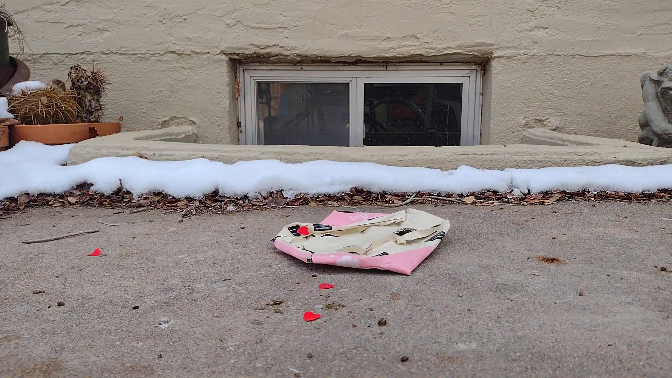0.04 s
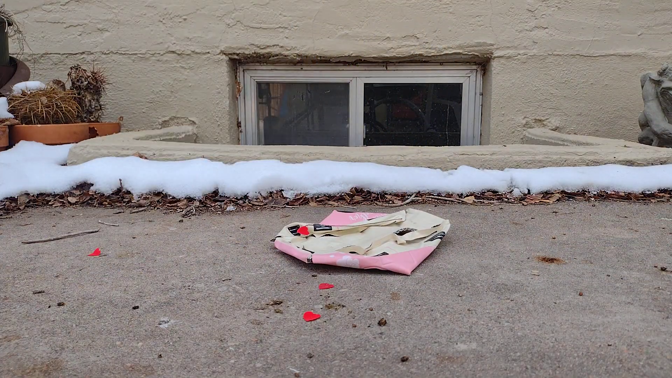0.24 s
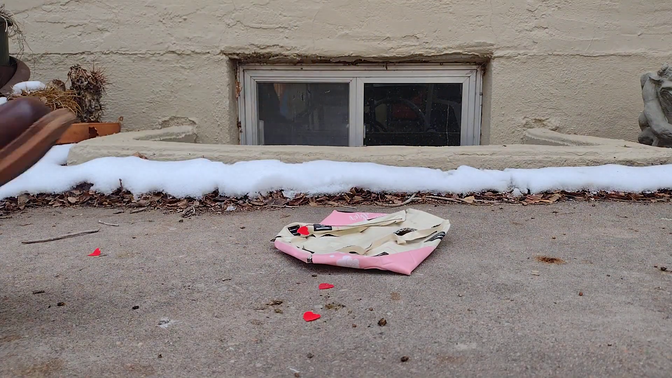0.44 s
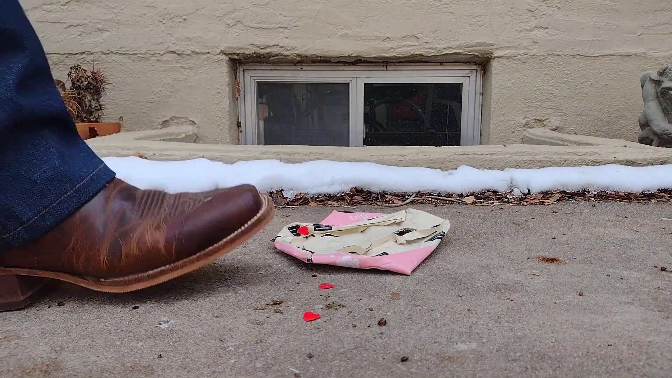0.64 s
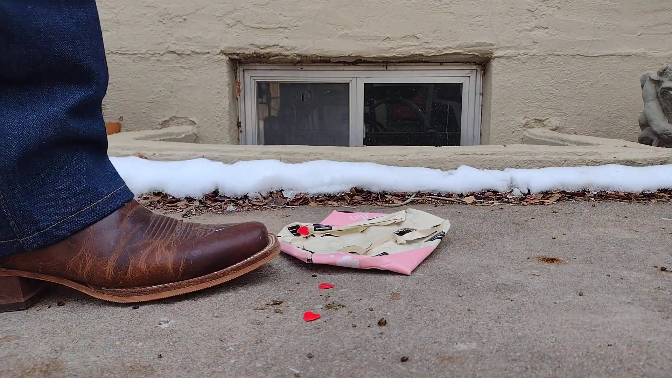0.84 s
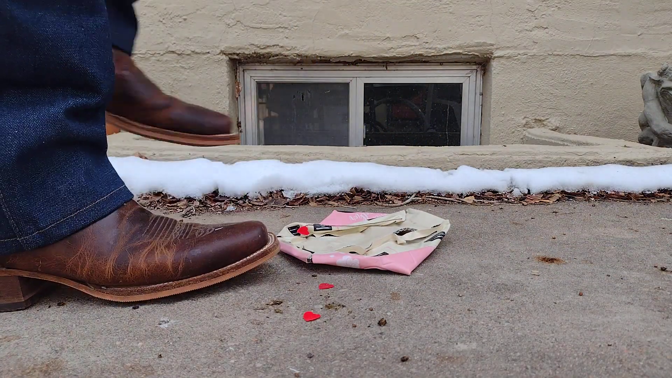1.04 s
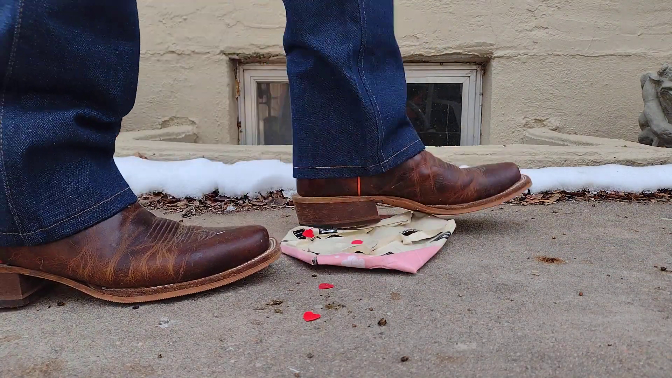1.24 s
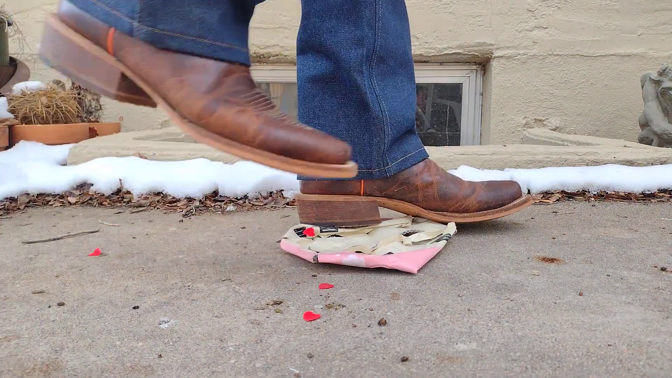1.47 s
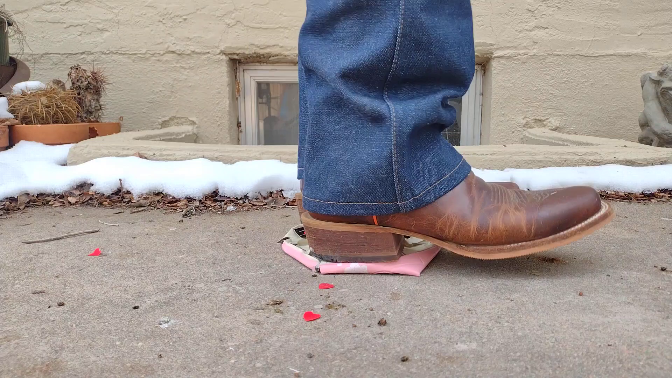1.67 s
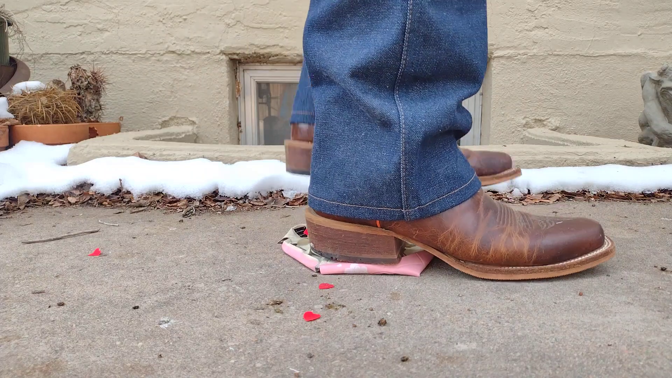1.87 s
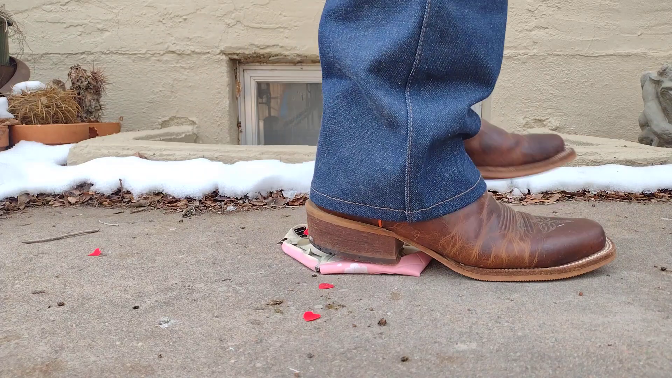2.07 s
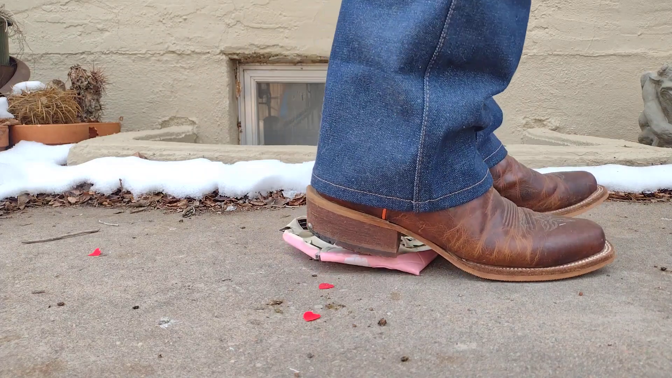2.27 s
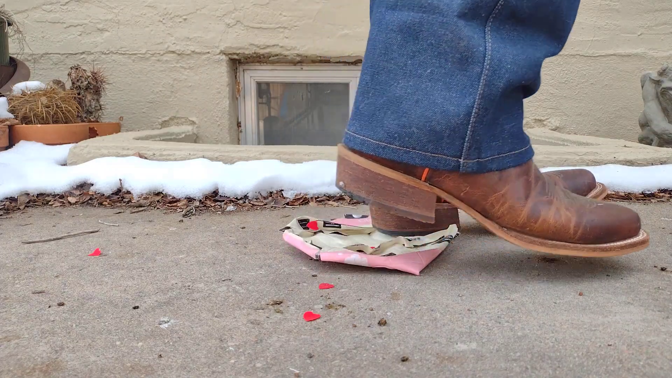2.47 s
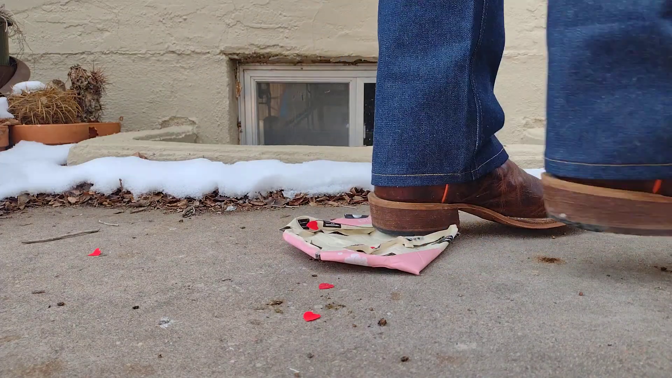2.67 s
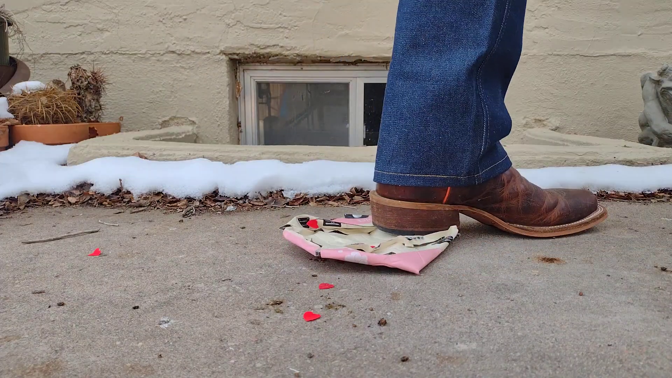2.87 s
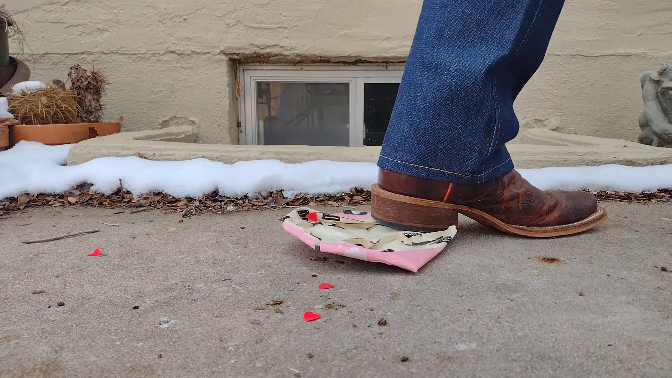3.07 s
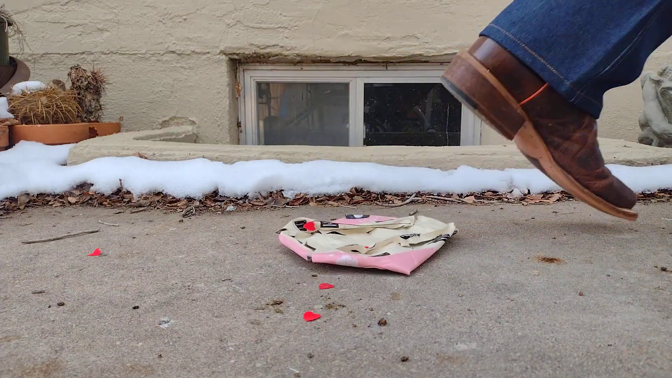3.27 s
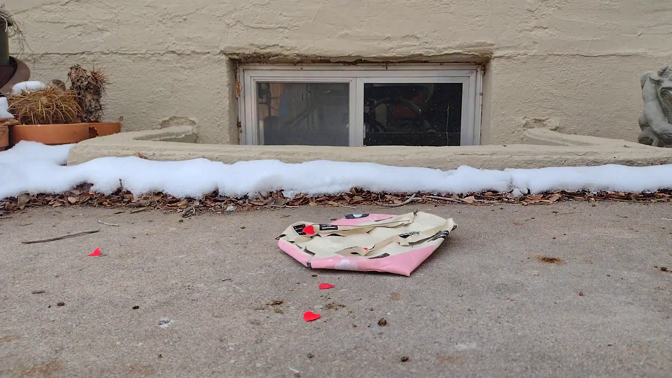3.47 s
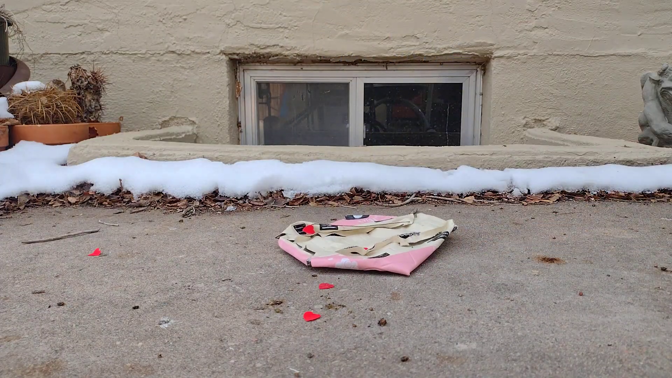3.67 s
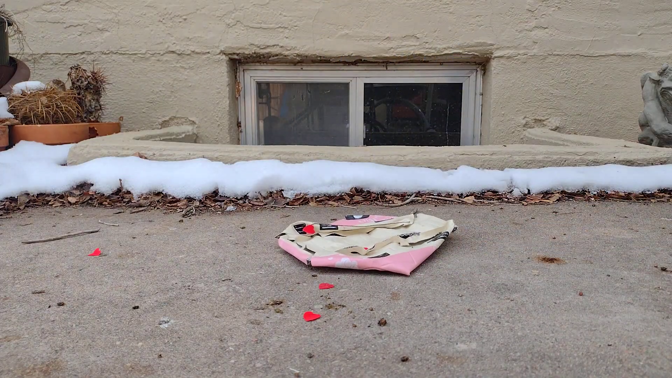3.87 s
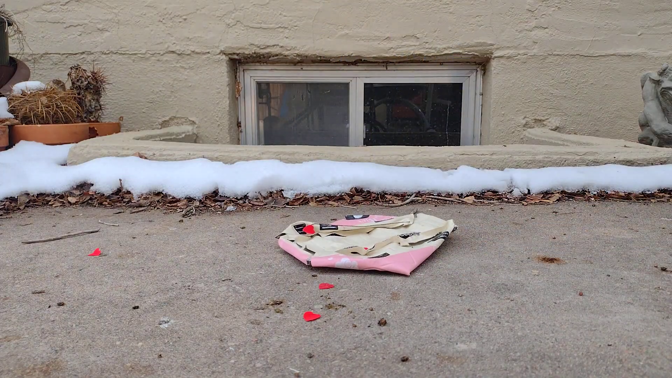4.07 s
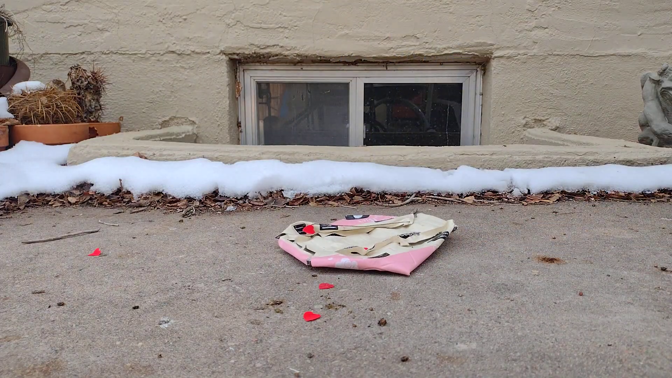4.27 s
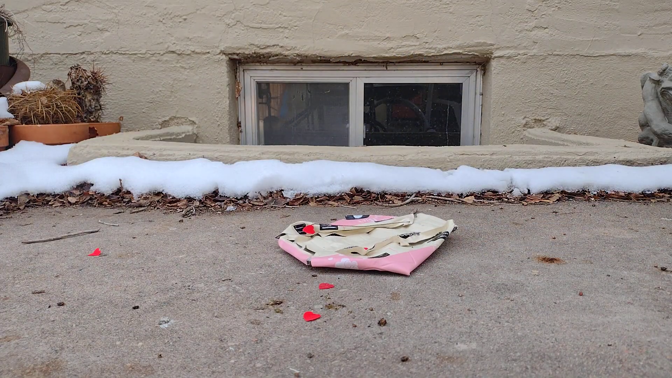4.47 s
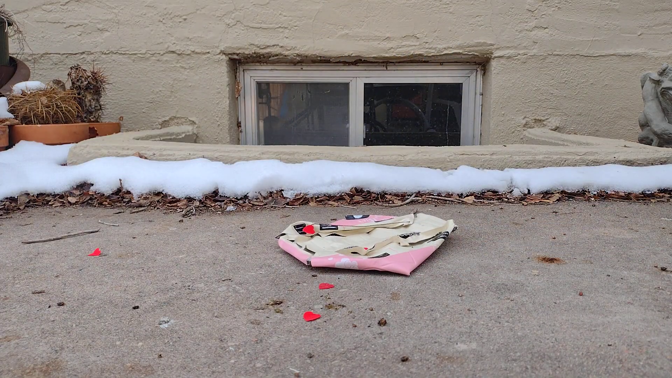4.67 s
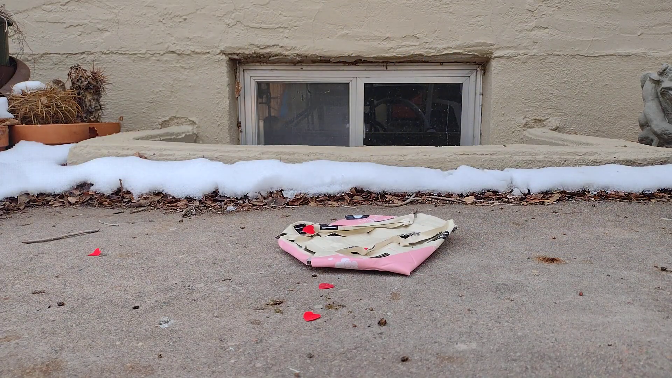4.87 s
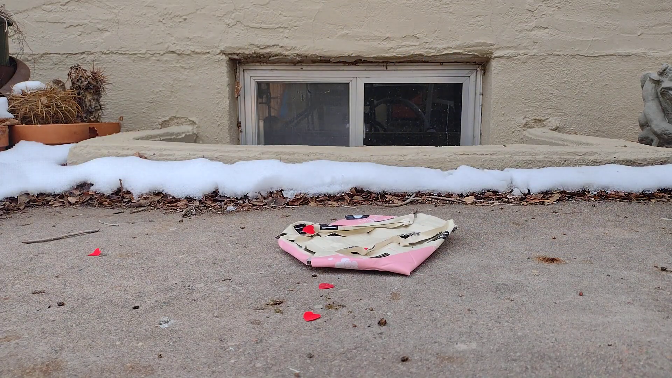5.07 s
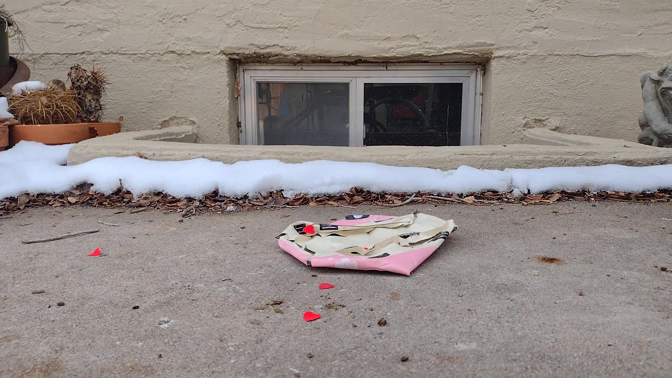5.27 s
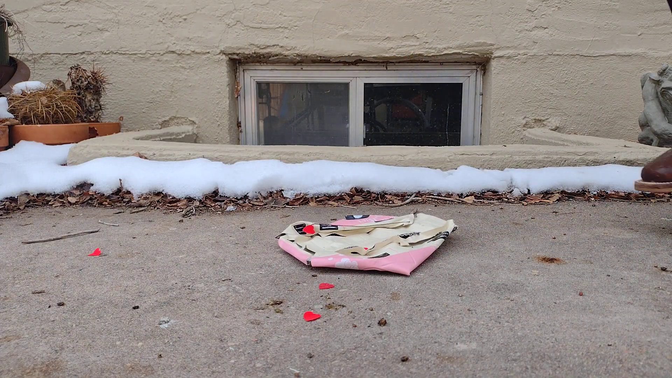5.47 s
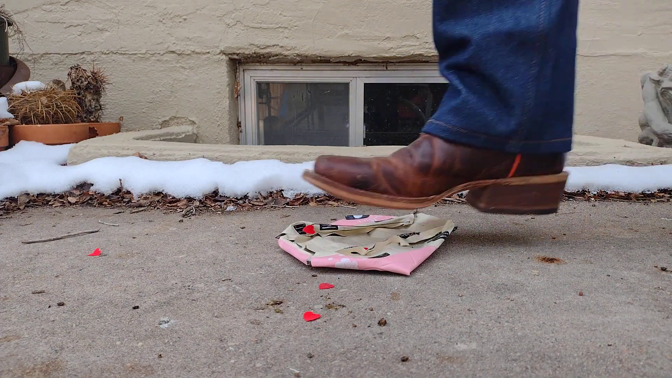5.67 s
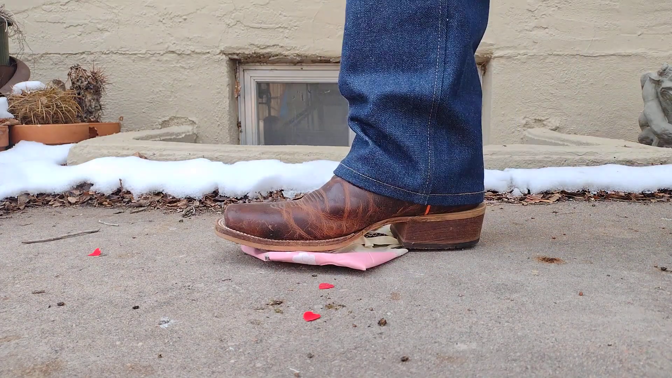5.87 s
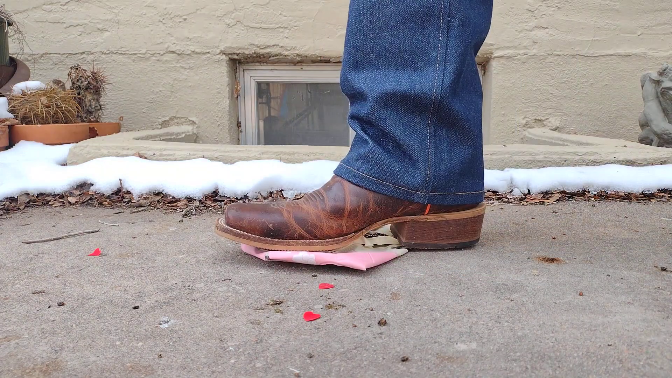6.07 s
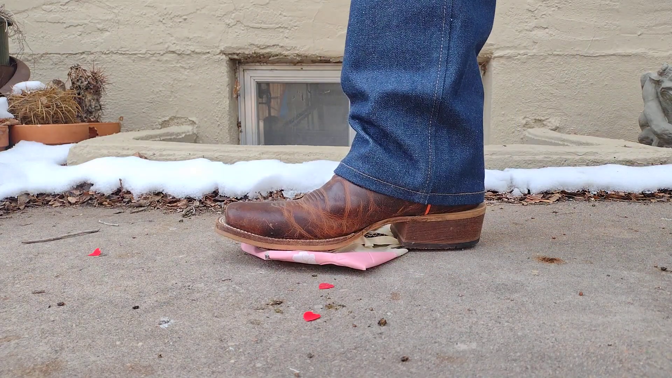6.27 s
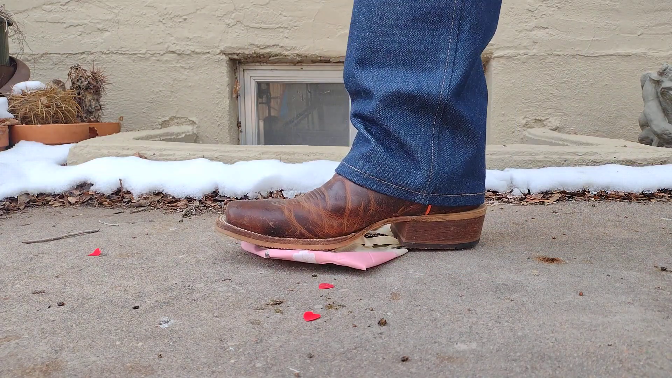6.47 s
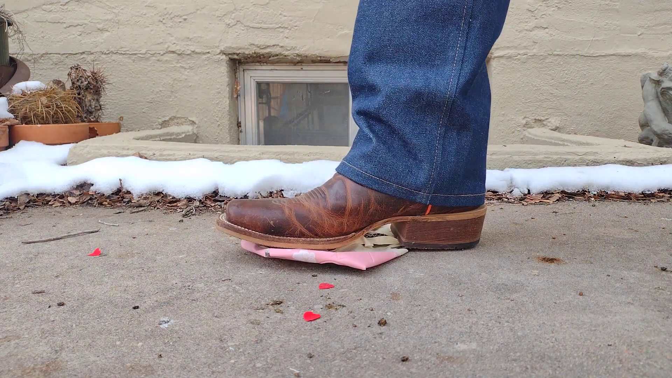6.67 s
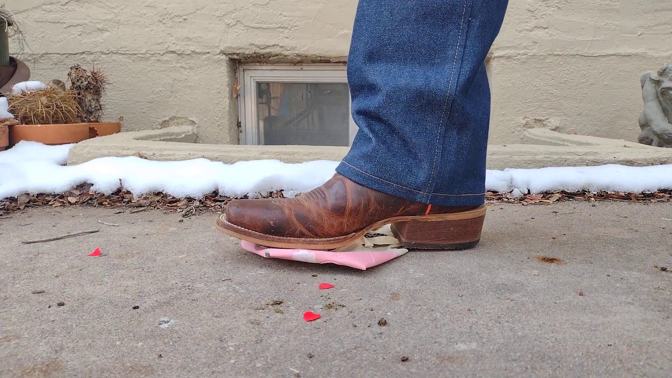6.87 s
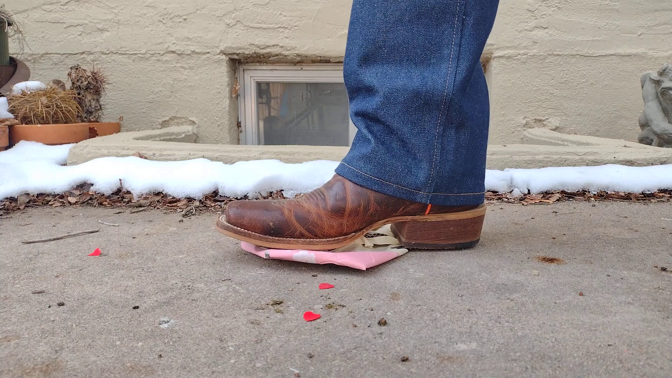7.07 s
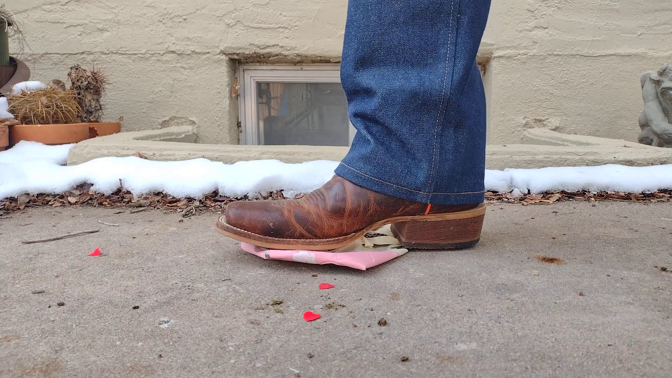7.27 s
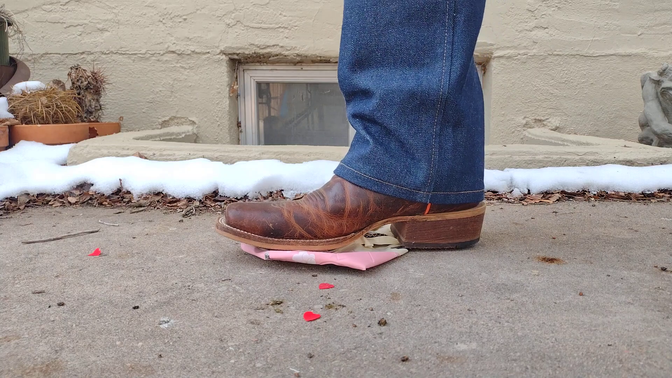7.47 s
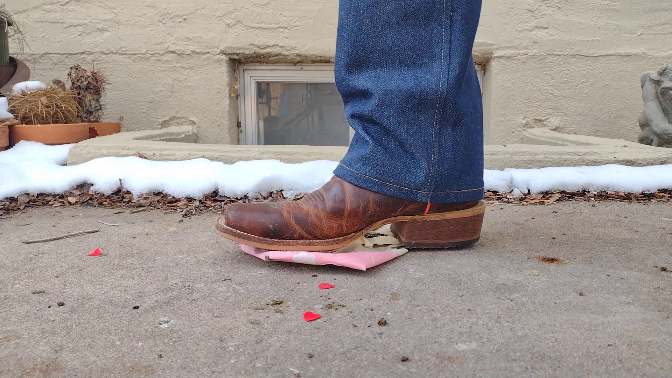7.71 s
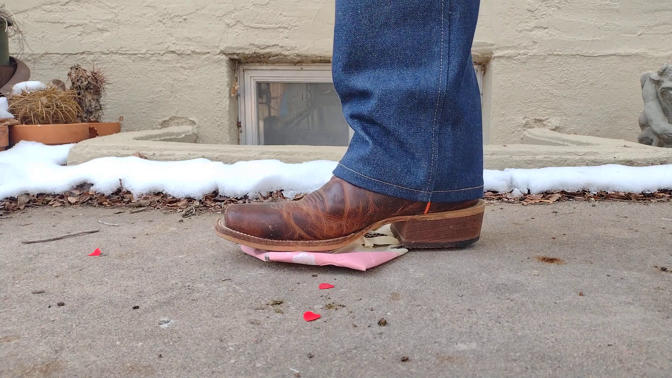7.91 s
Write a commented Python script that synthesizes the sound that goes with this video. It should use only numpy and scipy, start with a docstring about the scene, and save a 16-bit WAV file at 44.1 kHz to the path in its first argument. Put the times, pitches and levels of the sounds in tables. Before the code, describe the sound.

Outdoors, close to a concrete walk by a house wall, with soft low traffic rumble and faint airy hiss, a little stronger at the start. Two soft footfalls come near 0.1 s, then a solid heel thud at 0.7. At 1.3 a boot lands on a flattened thin tin: a loud cluster of dry metallic clanks and bright crinkles lasting about a tenth of a second. Further sharp clacks with low thuds follow at 1.75 and 2.23, with creasing and scuffing between. A step thuds at 3.07; from 3.2 to 3.7 the released tin rattles, buzzes and pings more lightly. Faint footfalls and small metallic ticks follow at 3.9, 4.15, 4.65 and 5.27. At 5.83 a hard double-edged stamp cracks the tin loudly, with a brief wall echo. A dull shift at 6.34, then tiny creaks and grit fade into quiet until 8 s.

```python
"""A concrete walk by a house wall: a boot stamps on a flattened tin, which snaps, clanks and crinkles.
Each buckle is a burst of chatter filtered by the sheet's crowded modes and by ringing panels and folds.
Heels thud as short pulses on the slab, soles scrape and grit scuffs as shaped noise.
The wall answers with decaying noise echoes; far traffic rumbles in a light breeze as filtered noise."""
import sys
import numpy as np
from scipy import signal
from scipy.fft import rfft, irfft, next_fast_len
from scipy.io import wavfile
from scipy.ndimage import uniform_filter1d, map_coordinates

SR = 44100
rng = np.random.default_rng(int(sys.argv[2]) if len(sys.argv) > 2 else 0)


def unload_audio(sound):
    """Save the sound as a 16-bit wav file, at the path given as the first command line argument."""
    columns = np.transpose(np.atleast_2d(sound))
    # keep every value between -1 and 1, then stretch to whole-number steps
    steps = np.round(np.clip(columns, -1, 1) * 32767)
    wavfile.write(sys.argv[1], SR, steps.astype(np.int16))


def how_loud(loudness_db):
    """Turn decibels into a plain amplitude multiplier (0 dB gives 1, 20 dB gives 10)."""
    steps = np.asarray(loudness_db, float) / 20
    return 10 ** steps


N = 350286


def unit(x):
    """Normalization: scale a signal to rms 1."""
    return x / np.sqrt(np.mean(x ** 2) + 1e-20)


def along(points, hz):
    """Interpolation of (Hz, value) points on a logarithmic frequency axis."""
    f, v = np.transpose(points)
    return np.interp(np.log(hz + 1), np.log(f + 1), v)


def curves(rows):
    """Linear envelopes: one value per sample for each column after the time."""
    s, *columns = np.transpose(rows)
    return [np.interp(np.arange(N) / SR, s, column) for column in columns]


def wobble(rate):
    """Band-limited fluctuation: a smooth random curve with rate knots a second."""
    knots = rng.standard_normal(int(N * rate / SR) + 4)
    return map_coordinates(knots, [np.arange(N) * rate / SR])


def filtered(x, response):
    """Linear filtering: the spectrum times a response of frequency."""
    m = next_fast_len(N + 8192)
    return irfft(rfft(x, m) * response(np.fft.rfftfreq(m, 1 / SR)), m)[..., :N]


def mid_side_share(alike, hz):
    """Interchannel coherence: mid and side gains that give the wanted left-right likeness."""
    turn = np.arccos(np.clip(along(alike, hz), -1, 1)) / 2
    return np.array([np.cos(turn), np.sin(turn)])


def paired(pair, spectrum, alike):
    """Partial coherence: two unrelated signals coloured and mixed into a stereo pair of rms 1."""
    mid, side = filtered(pair, lambda hz: how_loud(along(spectrum, hz)) * mid_side_share(alike, hz))
    return unit(np.array([mid + side, mid - side]))


def add(out, s, sound):
    """Superposition: mix a sound in at a time in seconds."""
    part = out[:, round(s * SR):][:, :sound.shape[1]]
    part += sound[:, :part.shape[1]]


def resonance(f, hz, width):
    """Damped oscillator: the response of one mode, with peak gain 1."""
    return 1j * f * width / (hz * hz - f * f + 1j * f * width)


# far traffic in the breeze: (time [s], rumble level [dB], hiss level [dB])
AIR = [(0, -42, -59), (.04, -39.5, -53.5), (.2, -45.5, -60), (.37, -53.5, -63.5), (.86, -51, -62.5),
       (1.39, -53, -65), (1.6, -55, -67.5), (2.76, -57.5, -68.5), (3.2, -56.5, -64), (3.87, -57.5, -69),
       (4.29, -63, -71), (4.82, -61.5, -72.5), (5.82, -59.5, -69.5), (6.15, -64.5, -72.5),
       (7.12, -63.5, -72.5), (7.56, -62.5, -74.5), (7.94, -65, -74.5)]
# spectrum of the rumble, also of the tin's grind: (frequency [Hz], relative level [dB])
RUMBLE_SPECTRUM = [(15, -60), (25, -25), (53, -9), (117, -0.5), (135, -4.5), (167, -5), (277, -14.5),
                   (372, -13.5), (600, -29), (780, -62), (1320, -120)]
# spectrum of the traffic hiss: (frequency [Hz], relative level [dB])
TRAFFIC_SPECTRUM = [(240, -31.5), (400, -9), (839, -6), (921, -9), (1140, -10), (1960, -24), (2590, -25),
                    (2970, -30.5), (16000, -48)]
# coherence of these diffuse sounds: (frequency [Hz], left-right likeness [-1 to 1])
DIFFUSE_LIKENESS = [(25, .5), (60, 1), (125, 0.88), (240, 0.71), (950, 0.04), (3770, 0.01), (15000, 0.06)]
# faint narrow bands of noise that come and go: (start [s], end [s], frequency [Hz], width [Hz], level [dB])
NARROW_BANDS = [(.25, .5, 9600, 150, -89), (5.32, 5.55, 3000, 200, -78), (6.55, 7.5, 3800, 130, -79),
                (6.6, 7.35, 6900, 300, -84), (6.6, 7.42, 11600, 200, -81), (6.6, 7.3, 12500, 300, -88),
                (7.68, 8, 2300, 150, -82), (7.7, 8, 3000, 200, -84), (7.7, 8, 12300, 500, -83),
                (7.7, 8, 14200, 400, -85), (7.68, 8, 15200, 400, -84)]


def street():
    """Broadband noise: rumble that swells in lumps, smooth traffic hiss; besides these, faint narrow bands of
    noise come and go."""
    rumble_db, hiss_db = curves(AIR)
    lumps_db = 2.2 * wobble(9.8) + 1.5 * wobble(2.0)
    rumble = paired(rng.standard_normal((2, N)), RUMBLE_SPECTRUM, DIFFUSE_LIKENESS)
    out = how_loud(rumble_db + lumps_db) * rumble
    hiss = paired(rng.standard_normal((2, N)), TRAFFIC_SPECTRUM, DIFFUSE_LIKENESS)
    out = out + how_loud(hiss_db + 0.57 * wobble(2.0)) * hiss
    for start, end, hz, width, db in NARROW_BANDS:
        noise = rng.standard_normal((2, round((end - start) * SR)))
        edges = [hz - width / 2, hz + width / 2]
        band = signal.sosfilt(signal.butter(2, edges, "band", fs=SR, output="sos"), noise)
        add(out, start, how_loud(db) * unit(band) * signal.windows.tukey(noise.shape[1], .5))
    return out


# decay of the wall's answer: (frequency [Hz], time to fall 60 dB [s])
WALL_T60 = [(150, 0.38), (1000, .3), (4000, .22), (12000, 0.18)]


def wall(x):
    """Reverberation: each frequency of the yard's answer decays at its own rate."""
    out, size = np.zeros((2, N)), SR // 4
    for start in range(0, N, size):  # a new tail every quarter second
        hz, t, z = signal.stft(rng.standard_normal((2, SR // 2)), SR, nperseg=256)
        blend = np.where(hz < 600, .4, 0)[:, None]  # bass is more alike on both sides
        z[1] = blend * (z[0] - z[1]) + z[1]
        decay = how_loud(-60 * t / along(WALL_T60, hz)[:, None])
        tail = signal.istft(z * decay, SR, nperseg=256)[1]
        tail = tail / np.linalg.norm(tail[0])
        echo = signal.fftconvolve(x[:, start:start + size], tail, axes=1)
        add(out, start / SR + 0.011, echo)
    return out


# the boot's weight shifting on the tin:
# (peak time [s], rise [dB/s], fall [dB/s], buzz level [dB], low grind level [dB])
SHIFTS = [(1.92, 93.5, 90.5, -59.5, -48.5), (2.4, 10, 61.5, -75, -67), (3.36, 108.5, 46, -44.5, -50.5),
          (3.47, 65.5, 105, -46.5, -62), (5.971, 60.5, 51, -70.5, -50.5)]


def weight():
    """Exponential envelopes: buzz and grind gains swell to each shift's peak and die away."""
    t = np.arange(N) / SR
    s, rise, fall, buzz_db, grind_db = np.transpose(SHIFTS)[:, :, None]
    slope_db = -rise * (s - t).clip(0) - fall * (t - s).clip(0)
    shape = how_loud(slope_db) * (s - t < .2)  # starts 0.2 s before the peak
    return (how_loud(buzz_db) * shape).sum(axis=0), (how_loud(grind_db) * shape).sum(axis=0)


# soles dragging over sand: (start [s], end [s], level [dB])
SCUFFS = [(-.1, .15, -78.5), (1.403, 1.499, -63.5), (1.454, 1.78, -73), (1.947, 2.65, -75),
          (3.02, 3.22, -73), (3.617, 4.351, -75.5), (5.295, 5.6, -75.5), (5.872, 6.194, -72.5),
          (6.365, 7.451, -71), (7.572, 8.201, -77)]


def grit():
    """Granular friction: sand and creasing foil give clumped tiny clicks over a hiss."""
    floor_db, crinkle_db = -76, -11  # grit at rest; crinkling relative to the buzz gain
    click_size = how_loud(3.5 * rng.exponential(size=N).clip(0, 3))
    clicks = rng.standard_normal((2, N)) * click_size * (rng.random(N) < .02)
    rasp = unit(clicks) * .5 + rng.standard_normal((2, N))
    colour = [(600, -31.5), (1300, -2.5), (3500, -1.0), (8000, -8), (16000, -9.0)]  # (Hz, dB)
    t = np.arange(N) / SR
    scuffs = sum(how_loud(db) * np.sin(np.pi * ((t - a) / (b - a)).clip(0, 1)) for a, b, db in SCUFFS)
    level = how_loud(floor_db) + scuffs + how_loud(crinkle_db) * weight()[0]
    noise = paired(rasp, colour, [(1000, 0.47), (4000, 0.082)])
    return level * unit(how_loud(1.5 * wobble(54)) * noise)


# heels and soles landing on the slab: (time [s], thump level [dB], pitch [Hz])
STEPS = [(0.05, -35, 193), (0.12, -33, 223), (0.6939, -18.5, 330), (1.3143, -20, 276), (1.334, -20, 380),
         (1.754, -19, 200), (1.784, -23.5, 205), (1.951, -27.5, 200), (2.223, -13.5, 200),
         (2.248, -23, 209.2), (3.0672, -19, 290), (3.09, -30, 260), (3.259, -38.5, 284.8),
         (3.875, -39.5, 210), (3.916, -43, 180), (4.576, -45.5, 180), (4.657, -41, 180),
         (5.263, -29.5, 300), (5.299, -36.5, 190), (5.477, -45.5, 250), (5.828, -18.5, 200),
         (5.847, -9.5, 400), (5.872, -18, 350), (6.3401, -22, 240), (6.367, -39, 230), (7.406, -42.5, 170),
         (7.464, -49, 170)]
# spectrum of the rolling sole's dull scrape: (frequency [Hz], relative level [dB])
ROLL_SPECTRUM = [(60, -16.5), (130, -1), (260, -5), (420, -9.5), (700, -21.5), (1200, -51)]


def settling():
    """Sliding friction: after each landing the sole rolls flat with a short, lumpy, dull scrape."""
    scrape_db, t60 = -17, .15  # relative to the thump level; decay [s]
    t = np.arange(N) / SR
    level = np.zeros(N)
    for s, db, _ in STEPS:
        onset = ((t - s) / 0.004).clip(0, 1)
        level += how_loud(db + scrape_db - 60 * (t - s).clip(0) / t60) * onset
    scrape = paired(rng.standard_normal((2, N)), ROLL_SPECTRUM, [(100, 1.0), (500, .9)])
    return level * how_loud(3 * wobble(60)) * scrape


def heels():
    """Impulse response: a heel's blunt push of a cycle or two excites a weak ring of sole and slab."""
    thump_cycles, ring_cycles = .6, 5.5  # width of the thump; scale of the ring's life
    slab_db, sole_db = -11, -16  # rings relative to the thump level
    sole_s = 0.0016  # time constant of a leather sole's landing [s]
    out, t = np.zeros((2, N)), np.arange(SR // 5) / SR
    for s, db, hz in STEPS:
        thump = np.sin(2 * np.pi * hz * t) * np.exp(-((t * hz - .8) / thump_cycles) ** 2)
        modes = np.r_[125, hz * np.array([.8, 1.45])]  # one slab mode, two sole modes
        t60 = ring_cycles / hz * np.array([3, 2.5, 2])
        tones = np.sin(2 * np.pi * np.outer(modes, t)) * how_loud(-60 * t / t60[:, None])
        ring = how_loud([slab_db, sole_db, sole_db]) @ tones
        onset = (1 - np.exp(-t / sole_s)) ** 2
        add(out, s, -how_loud(db) * (thump + ring * onset)[None])
    # a small sole moves little deep bass
    return signal.sosfilt(signal.butter(2, 90, "high", fs=SR, output="sos"), out)


def grind():
    """Dry friction: the loaded tin grates dully on the slab as fluctuating low noise."""
    noise = paired(rng.standard_normal((2, N)), RUMBLE_SPECTRUM, DIFFUSE_LIKENESS)
    return weight()[1] * how_loud(3.1 * wobble(12)) * noise


# stiff folds that ring on: (frequency [Hz], nominal width [Hz], relative level [dB])
FOLDS = [(1364, 33, -11), (1480, 10, -18), (1854, 100, -15.5), (2155, 10, -18)]


def rattle():
    """Repeated excitation: irregular taps keep the settling sheet's folds ringing in broken bursts."""
    taps = rng.standard_normal((2, N)) * how_loud(5 * wobble(90)) * (rng.random(N) < .05)

    def response(f):
        folds = sum(how_loud(db) * resonance(f, hz, 5 * width) for hz, width, db in FOLDS)
        return folds * resonance(f, 1400, 2100)

    mid, side = unit(filtered(taps, response)) * [[1], [.4]]
    return weight()[0] * np.array([mid + side, mid - side])


def little_snaps(count=36):
    """Random point process: small chance buckles, denser and stronger under more weight."""
    strength_db, panel_db = 14.5, 28.5  # largest, over the buzz gain; panel ring over the chatter
    buzz = weight()[0]
    dose = np.cumsum(np.sqrt(buzz) * (buzz > how_loud(-66)))
    when, size, pitch = rng.random((count, 3)).T
    at = np.searchsorted(dose / dose[-1], (np.arange(count) + when) / count).clip(SR // 2, N - 1)
    level_db = 20 * np.log10(buzz[at] + 1e-9) + strength_db - 8 * size
    return [(i / SR, db, 1150 * 2.3 ** p, 3, .045, panel_db) for i, db, p in zip(at, level_db, pitch)]


# smaller panels of the tin: (nominal frequency [Hz], nominal width [Hz], mean level [dB])
SMALL_PANELS = [(2330, 210, -4), (2990, 210, 1), (3840, 220, -0.5), (4830, 310, -7.5), (5630, 500, -8.5),
                (7240, 600, -7.5)]
# the sheet's crowd of small modes: (frequency [Hz], relative level [dB])
SHEET = [(290, -38), (500, -10), (974, -14.5), (1280, -2), (2330, -4), (3590, -1), (3980, -3), (8090, -4.5),
         (16000, -15)]
# coherence of the sheet's sound: (frequency [Hz], left-right likeness [-1 to 1])
SHEET_LIKENESS = [(500, 0.28), (1400, 0.94), (2800, 0.15), (5000, 0.058), (12000, .02)]


def buckle(panel_hz, treble_db, t60, panel_db, size=8192):
    """Modal excitation: a few ms of chatter fill the sheet's crowded modes and ring its panels."""
    t, f = np.arange(size) / SR, np.fft.rfftfreq(size, 1 / SR)
    noise, bend = rng.standard_normal((3, 2, size)), rng.standard_normal((2, len(SMALL_PANELS)))

    # uneven slips, led by a sharp crack
    chatter = how_loud(1.7 * map_coordinates(noise[0, 0], [t * 500], order=1)) * (t < .15)
    since = (t - .004).clip(0)
    crack = 1 + 0.81 * how_loud(-60 * since / 0.019)
    rise = (1 - np.exp(-since / 0.0015)) * chatter * crack
    body, top, knock = (rfft(v * rise * how_loud(-60 * t / (t60 * life)))
                        for v, life in zip(noise, [1, .7, .3]))

    small = sum(how_loud(db + 4 * b) * resonance(f, hz * (1 + .06 * a), width / 2)
                for (hz, width, db), a, b in zip(SMALL_PANELS, *bend))
    ripple_db = 2.5 * map_coordinates(noise[0, 1], [f / 700])  # every crease has its own colour
    sheet = how_loud(along(SHEET, f) + ripple_db) * (1 + 1.3 * small)
    high = 1 / (1 + (4500 / (f + 1)) ** 2)
    crowd = sheet * (body * (1 - high) + top * high * how_loud(treble_db))

    panel = resonance(f, panel_hz, 60)
    panel = panel + how_loud(-9) * resonance(f, 1.25 * panel_hz, 90)
    panel = panel + how_loud(-8.5) * resonance(f, .88 * panel_hz, 90)
    folds = sum(how_loud(db + 3.5) * resonance(f, hz * (1 + 0.037 * a), width)
                for (hz, width, db), a in zip(FOLDS, bend[1]))
    panel = (panel + folds) * resonance(f, panel_hz, 1900)  # little spills far from the panel's pitch

    # a sharp blow drives all modes evenly: flatten the knock's spectrum
    strength = np.linalg.norm(rise * how_loud(-60 * t / (t60 * 0.35)))
    knock *= strength / (uniform_filter1d(abs(knock), size=60) + 1e-9)
    share = mid_side_share(SHEET_LIKENESS, f)
    mid, side = irfft(share * (crowd + how_loud(panel_db) * panel * knock), size)
    return np.array([mid + side, mid - side])


# a big panel pops over and clanks:
# (time [s], strength [dB], panel pitch [Hz], treble [dB], nominal decay t60 [s])
CLANKS = [(1.3179, 6, 2038, -5.5, .053), (1.3211, -2.5, 1326, -5.5, 0.069), (1.3362, 1, 1220, -13.5, 0.033),
          (1.3504, -1.5, 1740, -0.5, .057), (1.36, -9.5, 1620, -9, .048), (1.3718, -4, 1286, 0.1, .045),
          (1.5668, -41.5, 1153, -5.5, 0.19), (1.7539, 0.5, 1304, 5.5, .07), (1.7577, -10, 1274, 4.1, .043),
          (1.7744, -23.5, 2050, -3, .078), (1.7844, -18.5, 2190, -1.93, .081),
          (1.8578, -29.5, 1030, 11, 0.1), (1.8675, -28, 1350, 11, .13), (1.9034, -17, 1350, 1.5, 0.045),
          (1.9345, -19.5, 1320, 8, .035), (1.9655, -39.5, 1387, 7.5, 0.11),
          (2.0047, -41.5, 1480, -18.5, 0.09), (2.2242, 0.94, 1127, -1.5, 0.062),
          (2.2299, 14, 1480, -1.97, .034), (3.2505, -26, 1830, 3.5, .07), (3.2655, -22, 1400, -11, .085),
          (3.2884, -32.5, 1600, -19, 0.072), (3.3297, -23.5, 1517, 4, .12), (3.367, -29.5, 1720, 6, .11),
          (3.3837, -18.5, 1410, 4.5, .063), (3.4233, -14, 1390, 9.5, .066), (3.472, -29, 1700, 9, .15),
          (3.5102, -20.5, 1710, 6, 0.049), (3.5456, -19.5, 1944, -2, .089),
          (3.6292, -32.5, 1910, -3, 0.098), (3.7191, -45, 1364, -2.5, .071),
          (3.8285, -33, 2100, 2.5, 0.051), (5.8268, -8, 1210, -7.5, .06), (5.83, 0.5, 1104, -1, .075),
          (5.8538, 1.5, 1960, -3.5, 0.055), (5.8663, 9.5, 1240, -7, 0.036),
          (5.8844, -37, 1720, -6.5, 0.045), (5.9096, -36, 2080, 12.5, .1), (5.9594, -30.5, 1450, -15, .063),
          (6.0303, -36.5, 1130, -19.5, 0.11)]
# a crease snaps while the panels hardly move:
# (time [s], strength [dB], treble [dB], nominal decay t60 [s])
CREASES = [(.0344, -46.5, 0.5, 0.05), (0.1312, -48.5, -4, 0.18), (.6938, -47, -10.5, 0.24),
           (.7487, -51, -1.5, 0.4), (0.8486, -51.5, 2.5, 0.27), (0.883, -55, 19, 0.084),
           (1.3295, -1, -11.5, .13), (1.3433, 14, 2, 0.026), (1.3843, -8, 4.5, 0.06),
           (1.3925, 10.5, 13, 0.023), (1.3969, -14, 14.5, 0.073), (1.4342, -25.5, 17.5, 0.055),
           (1.602, -40, 11.5, 0.049), (1.7495, -15.5, -9, 0.061), (2.0821, -51, 10, 0.091),
           (2.2197, -10.5, 4.5, 0.051), (2.2378, -15.5, 12.5, 0.051), (2.2537, -18, 5.5, 0.12),
           (2.2926, -23.5, 12, 0.068), (2.3431, -9.5, 3.5, 0.059), (2.8647, -31, 12, 0.036),
           (2.907, -33.5, 14.5, 0.039), (3.1553, -33, 4.5, 0.23), (3.1758, -31.5, 10, 0.11),
           (3.1982, -20.5, 6.5, 0.061), (3.3144, -29, 3.5, .043), (3.4161, -16, -17, 0.11),
           (3.456, -26, 6, 0.063), (3.6058, -17.5, 4.5, 0.058), (3.6661, -37.5, 3.5, 0.21),
           (3.8461, -28.5, -7, 0.14), (4.113, -47.5, -4, .18), (4.132, -48, -6.5, .06),
           (4.148, -39, -9, .06), (4.171, -41.5, -6, .06), (4.1951, -41.5, -7.5, 0.087),
           (4.6441, -39, -6.5, 0.067), (4.6652, -28.5, 1.5, 0.048), (4.8899, -50, -0.5, .093),
           (4.9294, -53.5, 0.8, .066), (5.12, -55, -4.5, .05), (5.17, -54, -6.5, .05),
           (5.2692, -48, 5.3, 0.19), (5.2994, -47, 3, .1), (5.8404, 6, 0.5, 0.06),
           (5.8484, 5.5, -0.5, 0.037), (5.8592, 1.5, 4, 0.053), (6.0599, -43, -12.5, 0.096),
           (6.3416, -39.5, -8.5, 0.076), (6.3776, -44.5, -8, 0.091), (6.4353, -47.5, 7, 0.069),
           (6.5394, -51.5, 4.5, .07), (6.707, -48.5, 6, 0.05), (6.9479, -44, 1.5, .11),
           (6.968, -46.5, 1, 0.065), (7.2937, -48.5, 5, 0.062), (7.3406, -56.5, 7, .06),
           (7.5018, -44.5, -2, 0.069), (7.76, -56.5, 13.5, 0.049), (7.857, -50, 16, 0.03)]


def tin():
    """Snap-through buckling: the bent sheet jumps between shapes, in clanks, creases and small snaps."""
    clank_panel_db, crease_panel_db = 26, 11.5  # the panel's ring over the sheet's chatter
    out = np.zeros((2, N))
    snaps = [(*row, clank_panel_db) for row in CLANKS]
    for s, db, treble_db, t60 in CREASES:
        panel_hz = 1471 * np.exp(.16 * rng.standard_normal())
        snaps.append((s, db, panel_hz, treble_db, t60, crease_panel_db))
    for s, db, *settings in snaps + little_snaps():
        add(out, s - .005, how_loud(db) * buckle(*settings))
    return out


def scene():
    """Superposition: the tin and boots close by, the wall behind, the street far off."""
    sheet, boots = tin(), heels()
    echoes = wall(how_loud(-15.5) * sheet + how_loud(-12.5) * boots)
    contact = settling() + rattle() + grind() + grit()
    return sheet + boots + echoes + contact + street()


def low_pass(x):
    """Removes everything above the highest recorded frequency."""
    return signal.sosfilt(signal.butter(12, 16490, fs=SR, output="sos"), x)


def record(dry):
    """Transduction: the microphones drop the deep bass, and the loudest clacks saturate softly."""
    dry = signal.sosfilt(signal.butter(1, 90, "high", fs=SR, output="sos"), dry)
    ceiling = .95  # amplitude that soft clipping approaches
    mix = dry / (1 + np.abs(dry / ceiling) ** 4) ** (1 / 4)
    return low_pass(mix)


dry = scene()
out = record(dry)
unload_audio(out)
```